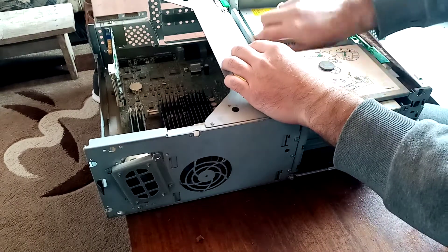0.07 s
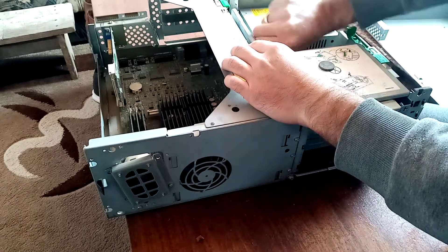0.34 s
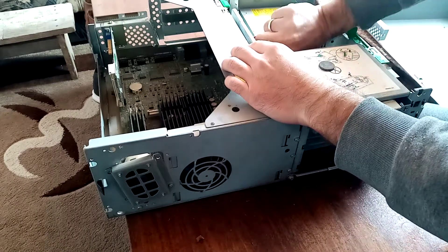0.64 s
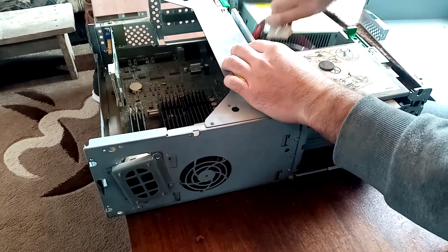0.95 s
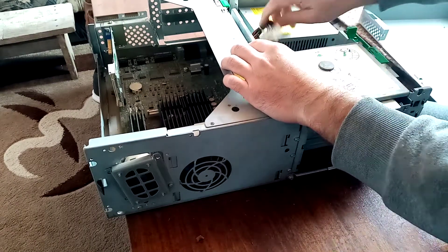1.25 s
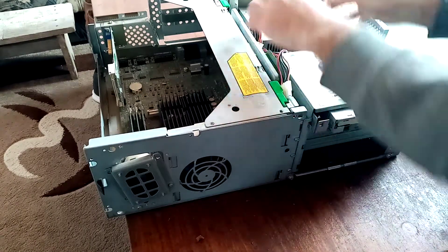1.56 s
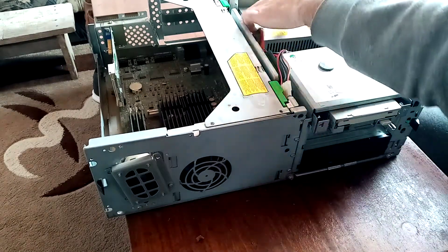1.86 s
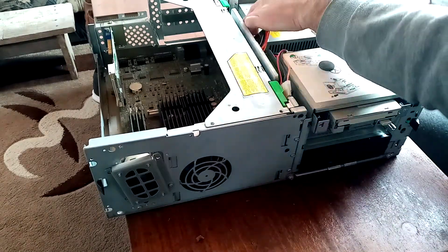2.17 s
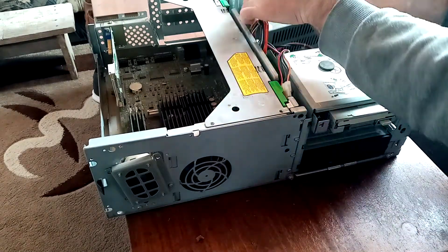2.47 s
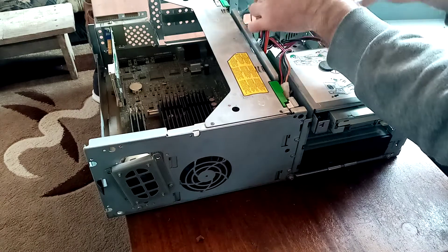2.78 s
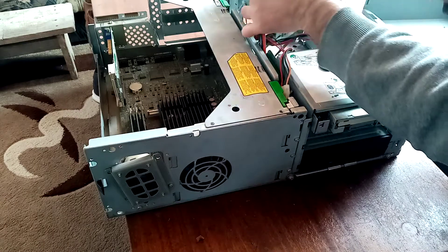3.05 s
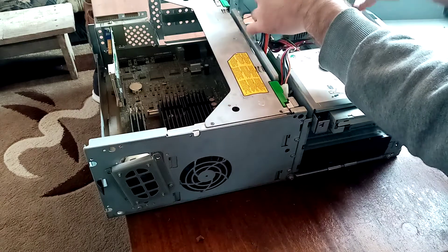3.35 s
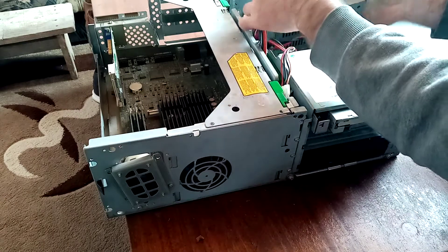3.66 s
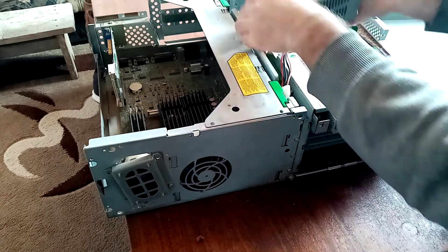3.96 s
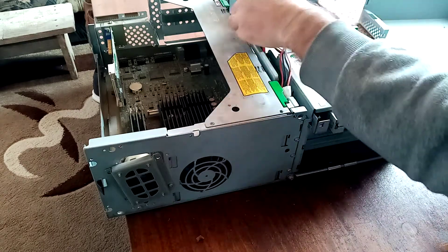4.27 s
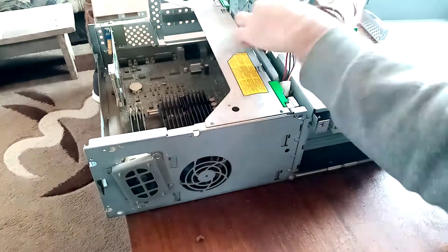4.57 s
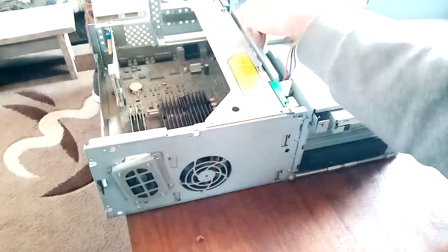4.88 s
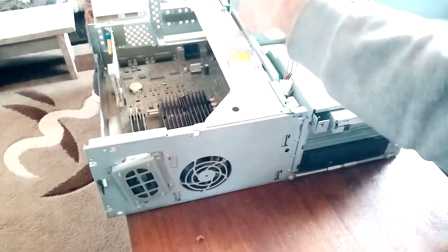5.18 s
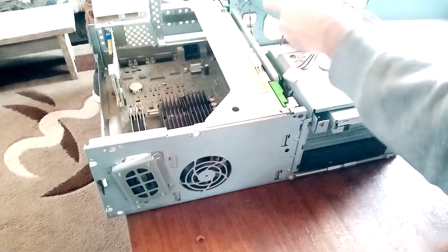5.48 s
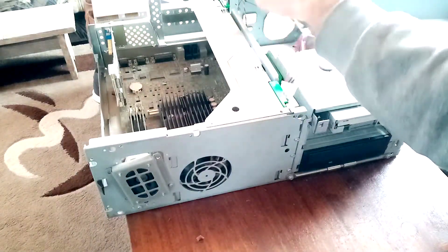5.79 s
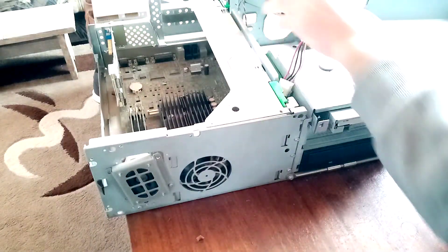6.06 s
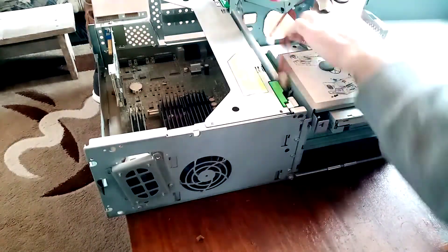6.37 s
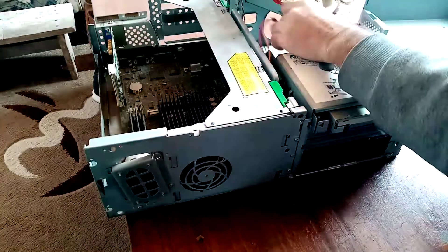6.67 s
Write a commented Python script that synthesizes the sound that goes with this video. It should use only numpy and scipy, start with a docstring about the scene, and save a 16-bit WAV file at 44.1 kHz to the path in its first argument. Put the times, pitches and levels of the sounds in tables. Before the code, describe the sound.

Hands work inside a steel computer case, with irregular knocks, clicks and scrapes of metal and plastic parts.

```python
"""Hands free cables and a drive in an open steel computer case on a table, in a small room.
Light taps lead, just before 1 s, to the loudest knocks: impacts excite the modes of the panels and
the case rocks. From about 2 s a sleeve brushes past and parts scrape by stick-slip friction.
Lighter knocks and rubbing follow; from near 5 s to the end, plugs and steel parts click more sharply.
Throughout, the sound and its reflections reach two unlike microphones over a faint room tone."""
import sys
import numpy as np
from scipy import signal
from scipy.fft import rfft, irfft, next_fast_len
from scipy.io import wavfile

SR = 44100
rng = np.random.default_rng(int(sys.argv[2]) if len(sys.argv) > 2 else 0)


def persist_wave(psi):
    """Save psi, clipped to +-1, as 16-bit WAV."""
    counts = np.round(np.clip(psi, -1, 1) * 32767).astype(np.int16)
    wavfile.write(sys.argv[1], SR, np.atleast_2d(counts).T)


N = 305613
RESPONSE_SAMPLES = 24000
T = np.arange(RESPONSE_SAMPLES) / SR  # time axis of one impulse response [s]
RIGHT_LAG_S = 0.0009  # the case lies nearer the left microphone

# spectrum of the room tone: (frequency [Hz], relative density [dB])
ROOM_TONE_SPECTRUM = [(30, 4), (100, 4.5), (270, 1.5), (500, 11), (1000, -17.5), (3000, -7.5),
                      (8000, -9), (15000, -18.5)]
# reverberation of the room: (frequency [Hz], t60 [s])
ROOM_T60 = [(100, 0.28), (400, 0.29), (1000, 0.25), (3000, 0.26), (7000, 0.21), (15000, 0.18)]
# swings of the sleeve along the case: (middle [s], duration [s], level [dB])
SLEEVE_SWINGS = [(0.3, 0.91, -75.5), (1.22, 0.17, -61.5), (1.7, 0.55, -58), (2.36, 0.79, -54),
                 (3.683, 0.66, -70), (4.4, 1.5, -71.5), (5.5, 0.48, -64), (6.177, 0.13, -75),
                 (6.65, 0.98, -64.5)]
# spectrum of rubbing cloth: (frequency [Hz], relative density [dB])
CLOTH_SPECTRUM = [(200, -7.5), (1000, -16), (3000, -5), (7000, 4), (10000, 2.5), (15000, 5.5)]
# modes of the steel case: (frequency [Hz], relative level [dB], t60 [s])
CASE_MODES = [(125, 0, 0.061), (180, 1, 0.25), (190, -2, 0.072), (283.6, -2, 0.28), (352.2, 4, 0.12),
              (441.7, 1.5, 0.26), (643.6, 2, 0.37), (840, -11, 0.36), (915, -5.5, 0.24), (1095, 2, 0.04),
              (1185, 8, 0.12), (1480, -12.5, .22), (1535, -10, 0.28), (1635, -5, 0.22), (1727, -0.5, 0.5),
              (2823, -8.5, 0.37), (3800, 0, 0.2)]
# a hand pushes or pulls a part: (start [s], duration [s], bump level [dB], scrape level [dB])
HAND_MOVES = [(0.164, 0.083, -68, -68.5), (0.267, 0.15, -66, -66.5), (0.663, 0.04, -59, -57),
              (0.688, 0.29, -44, -42), (1.13, 0.27, -70.5, -78.5), (1.851, 0.11, -55.5, -61),
              (2.085, 0.21, -58.5, -46), (2.385, 0.18, -51, -40.5), (2.588, 0.11, -64.5, -53.5),
              (2.846, 0.29, -81, -67.5), (3.065, 0.11, -61, -58.5), (3.18, 0.22, -64.5, -52),
              (3.556, 0.059, -84, -68.5), (3.892, 0.47, -65.5, -62), (4.076, 0.08, -58, -56.5),
              (4.287, 0.36, -60.5, -65.5), (4.342, 0.033, -68, -49.5), (4.778, 0.085, -60, -58),
              (4.907, 0.15, -59, -59.5), (5.15, 0.15, -73.5, -67.5), (5.231, 0.27, -63, -53),
              (5.578, 0.35, -56, -54), (5.96, 0.057, -66, -78), (6.166, 0.038, -69, -84),
              (6.267, 0.12, -58, -45), (6.503, 0.06, -62.5, -49), (6.631, 0.063, -63, -55),
              (6.787, 0.13, -65, -58)]
# hands resting on the case: (bump level [dB], scrape level [dB])
RESTING_DB = [-78, -80.5]
# spectrum of fingers bumping the chassis: (frequency [Hz], relative gain [dB])
BUMP_SPECTRUM = [(30, -30.5), (70, -20.5), (130, -0.5), (280, 8.5), (400, 7), (600, -17), (1500, -28.5)]
# spectrum of parts scraping on steel: (frequency [Hz], relative gain [dB])
SCRAPE_SPECTRUM = [(200, -31.5), (500, 6.5), (950, 0.5), (1500, 2), (3000, -1.5), (4500, -5), (6200, -3),
                   (9000, -11), (15000, -11)]
# heavy pushes rock the case on the table: (time [s], frequency [Hz], level [dB], t60 [s])
ROCKING_THUMPS = [(.785, 118, -50, 0.31), (.954, 114, -31, 0.074), (.967, 278, -5.5, 0.022),
                  (2.137, 133, -48, 0.13), (3.207, 451, -21.5, 0.031), (3.347, 440, -29, 0.07),
                  (3.366, 334, -46, 0.045), (6.247, 153.5, -46, 0.84)]
# panels, thin edges and clips catch and ring: (time [s], frequency [Hz], level [dB], t60 [s])
PANEL_PINGS = [(.425, 1600, -57, .2), (.695, 1785, -35, .3), (.705, 1641, -38, .3), (.78, 431, -33, .3),
               (1.295, 809, -47, .3), (2.555, 2390, -44, .26), (3.041, 1530, -50, .24),
               (3.568, 6700, -57, .1), (4.556, 4323, -57, .3), (5.345, 800, -53, .3),
               (5.734, 1090, -43, .18)]
# clicks and knocks; weight adds chassis thud, hardness is high for steel and low for a padded knock:
# (time [s], force [dB], weight [dB], hardness [dB])
IMPACTS = [(-0.008, -52, -2.5, 4), (0.153, -69.5, 4, 8), (0.309, -63.5, 2, -1), (0.403, -54, -12, -5.5),
           (0.694, -25, -6.5, -4.5), (0.704, -37, -4, 5.5), (0.775, -27, -2.5, -4), (0.793, -30, 0, -3.5),
           (0.808, -36.5, -9, -1.5), (0.933, -35, 7.5, -16), (0.948, -35.5, -0.5, 1.5),
           (0.962, -31.5, -2.5, -4.5), (1.293, -40.5, -10, -11), (1.412, -54.5, -14, -14.5),
           (1.665, -52, -2, -13.5), (1.82, -52, -8, -8), (1.871, -51, 4, -4.5), (2.049, -56, -5, 3.5),
           (2.111, -39.5, 1, -11.5), (2.137, -38.5, 3.5, -6.5), (2.368, -39, -4, 1), (2.388, -49, 0.5, 4),
           (2.653, -58.5, -12, 13), (2.821, -52, -8.5, -7), (2.853, -60, -3.5, 7.5),
           (2.96, -53.5, -5.5, -13), (3.038, -47, -20, -8), (3.208, -46, 5, -11.5), (3.27, -46.5, 5, -6),
           (3.341, -44, 5, -6), (3.568, -65.5, 7, -19), (4.131, -42, -0.5, -2.5), (4.297, -48.5, -4, -1),
           (4.392, -45, -3, -7), (4.508, -55.5, 4.5, -14), (4.572, -55, 4.5, -6.5),
           (4.744, -73.5, 11.5, -2), (4.799, -48, -9.5, 2), (4.822, -53, 7.5, 2), (4.873, -37, -9, 5.5),
           (4.884, -41, 0.5, 6), (4.972, -51.5, 7.5, -5.5), (5.239, -53, 6.5, 2.5), (5.412, -64, -6, 12),
           (5.458, -47.5, -4, -7), (5.487, -59.5, -17, 17), (5.612, -48.5, 7, -3), (5.732, -33, -17, 1.5),
           (5.804, -45.5, -13, 10.5), (5.809, -38, -12.5, -6), (5.933, -50, -1, 3), (6.241, -40, -3.5, 8),
           (6.251, -31, -0.5, -17.5), (6.333, -42, -9, 5.5), (6.359, -61, -1.5, 14.5),
           (6.5665, -44.5, -6, 8), (6.864, -44.5, -13, 4.5), (6.88, -40.5, -6, 7.5)]
# spectrum of a blow before its registers are balanced: (frequency [Hz], relative gain [dB])
IMPACT_SPECTRUM = [(30, -27), (60, -24.5), (85, -14), (125, -0.5), (190, 2.5), (280, 6.5), (430, 4),
                   (540, -3.5), (700, -2.5), (1100, -11.5), (1800, -9.5), (2600, -9), (3200, -10.5),
                   (4700, -11), (6500, -9.5), (9000, -17), (15000, -18.5)]
# edges of the thud, body, clack and tick registers: (frequency [Hz])
REGISTER_EDGES = [80, 500, 2000, 7000, 16000]
# response of the left microphone: (frequency [Hz], gain [dB])
LEFT_RESPONSE = [(100, -5.5), (1300, -6.5), (4400, -3.5), (8000, -7), (9300, 1), (11000, -34.5),
                 (13500, -23.5), (15300, -29.5)]
# response of the right microphone: (frequency [Hz], gain [dB])
RIGHT_RESPONSE = [(9000, -0.5), (11000, -7.5), (13800, -11.5), (15200, 3)]


def amp(db):
    """Amplitude ratio of a level in decibels."""
    return 10 ** (np.asarray(db) / 20)


def unit_rms(x):
    """Normalisation to a mean power of one."""
    return x / np.sqrt(np.mean(x ** 2) + 1e-20)


def unit_energy(x):
    """Normalisation of each row to an energy of one."""
    return x / (np.linalg.norm(x, axis=-1, keepdims=True) + 1e-20)


def curve(points, hz):
    """Interpolation of (frequency, value) points on a log-frequency axis."""
    point_hz, value = np.transpose(points)
    return np.interp(np.log(hz + 1), np.log(point_hz + 1), value)


def filtered(x, points):
    """Zero-phase filtering by a curve of (frequency [Hz], gain [dB])."""
    size = next_fast_len(x.shape[-1] + 2048)
    gain = amp(curve(points, np.fft.rfftfreq(size, 1 / SR)))
    return irfft(rfft(x, size) * gain, size)[..., :x.shape[-1]]


def minimum_phase(db):
    """Causality: a frequency response with these gains that rings only after the blow."""
    log_gain = np.log(amp(np.r_[db, db[-2:0:-1]]))
    return np.exp(np.conj(signal.hilbert(log_gain)))[:len(db)]


def add(mix, start_s, sound):
    """Superposition of a stereo sound on the mix."""
    start = round(start_s * SR)
    part = mix[:, max(start, 0):start + sound.shape[1]]
    part += sound[:, max(-start, 0):][:, :part.shape[1]]


def room_tone(level_db=-88.5):
    """Stationary noise, uncorrelated between the two microphones."""
    return amp(level_db) * unit_rms(filtered(rng.standard_normal((2, N)), ROOM_TONE_SPECTRUM))


def room_response(tail_db=7.0, early_s=0.0082, build_s=0.003, coherent_hz=600, echoes_per_s=9000):
    """Multipath propagation from one spot: direct sound, case-wall reflections, reverberant tail."""
    shape = (2, RESPONSE_SAMPLES)
    echoes = rng.standard_normal(shape) * (rng.random(shape) < echoes_per_s / SR)
    hz, t, spectra = signal.stft(echoes, SR, nperseg=256)
    coherence = 1 / (1 + (hz[:, None] / coherent_hz) ** 2)  # long waves reach both microphones alike
    spectra[1] = coherence * spectra[0] + np.sqrt(1 - coherence ** 2) * spectra[1]
    decay = amp(-60 * t / curve(ROOM_T60, hz)[:, None])
    tail = signal.istft(spectra * decay, SR, nperseg=256)[1][:, :RESPONSE_SAMPLES]
    early = np.roll(tail, -RESPONSE_SAMPLES // 20, axis=1) * np.exp(-T / early_s)
    response = unit_energy(early) + amp(tail_db) * unit_energy(tail * (1 - np.exp(-T / build_s)))
    response[:, 0] += 1  # direct sound
    response[1] = np.roll(response[1], round(RIGHT_LAG_S * SR))
    return response


def moving_source(x, spots=3, wander_hz=2.5):
    """Reflections depend on position: the wandering hand crossfades between paths at constant power."""
    turns = wander_hz * np.arange(N) / SR + np.arange(spots)[:, None] / spots
    shares = np.cos(np.pi * turns) * np.sqrt(2 / spots)
    return sum(signal.oaconvolve((share * x)[None], unit_energy(room_response()), axes=1)[:, :N]
               for share in shares)


def stick_slip(per_s, spread_db):
    """Stick-slip friction: tiny impulses of unequal size at random moments."""
    sizes = amp(spread_db * np.minimum(rng.exponential(1, N), 4))
    return unit_rms(rng.choice([-1, 1], N) * (rng.random(N) < per_s / SR) * sizes)


def sleeve(rest_db=-77):
    """Friction of cloth fibres: a bright hiss that follows the speed of an arm never quite still."""
    t = np.arange(N) / SR
    speed = sum(amp(db) * np.cos(np.pi * np.clip((t - middle) / length, -.5, .5))
                for middle, length, db in SLEEVE_SWINGS)
    hiss = unit_rms(filtered(stick_slip(per_s=7000, spread_db=3.5), CLOTH_SPECTRUM))
    return moving_source((amp(rest_db) + speed) * hiss)


def case_modes():
    """Normal modes of the steel case: one damped sinusoid a row."""
    hz, db, t60 = np.transpose(CASE_MODES)[:, :, None]
    return amp(db) * unit_energy(np.sin(2 * np.pi * hz * T) * amp(-60 * T / t60))


def effort(start, length, grip_s=0.022, ease_db_per_s=13.5, release_db_per_s=225.5):
    """Driving force of a hand: a linear rise, exponential decay as the part gives, then release."""
    age = np.maximum(np.arange(N) / SR - start, 0)
    fall_db = ease_db_per_s * age + release_db_per_s * np.maximum(age - length, 0)
    return np.minimum(age / grip_s, 1) * amp(-fall_db)


def handling(case_db=-29):
    """Forced vibration of the chassis: fingers bump it, cables and the drive scrape over its steel."""
    efforts = np.array([effort(start, length) for start, length, _, _ in HAND_MOVES])
    move_gains = amp(np.array(HAND_MOVES)[:, 2:]).T
    bump_envelope, scrape_envelope = amp(RESTING_DB)[:, None] + move_gains @ efforts
    body = amp(case_db) * case_modes().sum(0)
    body[0] += 1  # the impulse itself, ahead of the ringing
    bumps = signal.oaconvolve(stick_slip(per_s=65, spread_db=-2.5), body)[:N]
    scrapes = signal.oaconvolve(stick_slip(per_s=650, spread_db=4.0), body)[:N]
    return moving_source(bump_envelope * unit_rms(filtered(bumps, BUMP_SPECTRUM))
                         + scrape_envelope * unit_rms(filtered(scrapes, SCRAPE_SPECTRUM)))


def free_vibrations(events, rise_s):
    """Damped oscillation: each event excites one mode, which reaches the left microphone first."""
    out = np.zeros((2, N))
    age = np.maximum(T - np.array([[0], [RIGHT_LAG_S]]), 0)
    for start, hz, db, t60 in events:
        envelope = amp(db - 60 * age / t60) * (1 - np.exp(-age / rise_s))
        add(out, start, np.sin(2 * np.pi * hz * age) * envelope)
    return out


def small_part_modes(count=120, t60=0.012):
    """Small bodies resonate high: plugs, brackets and clips give a crowd of quickly damped modes."""
    hz = rng.uniform(1550, 11000, (count, 1))
    return unit_energy(np.sin(2 * np.pi * hz * T) * amp(-60 * T / t60))


def register_levels(force_db, weight_db, hardness_db, tick_db=-3.5, tick_growth=1.3):
    """Energy of an impact by register: weight feeds the thud, hardness the clack and tick."""
    return force_db + np.array([weight_db, 0, hardness_db, tick_db + tick_growth * hardness_db])


def contact_time(levels_db, force_db, base_s=0.0015, firm_db=-45):
    """Contact stiffness: bright steel-on-steel blows end at once, dull or light ones press in slowly."""
    brightness_db = np.clip(levels_db[-1] - force_db, -10, 20)
    lightness_db = np.clip(firm_db - levels_db.max(), 0, 10)
    return base_s * amp(0.22 * lightness_db - 0.21 * brightness_db)


def register_filter(spectrum, hz, levels_db, span_s=0.03):
    """Equalisation: brings each register's energy, averaged over span_s, towards its level."""
    edges = np.array(REGISTER_EDGES)
    centres = np.sqrt(edges[1:] * edges[:-1])
    bands = (hz >= edges[:-1, None]) & (hz < edges[1:, None])
    power = (abs(spectrum) ** 2).mean(0) / (len(hz) - 1) / (span_s * SR)
    gain_db = np.zeros(len(centres))
    for _ in range(3):  # neighbouring registers overlap, so their gains settle together
        gain = amp(curve(np.c_[centres, gain_db], hz))
        gain_db += levels_db - 10 * np.log10(bands @ (power * gain ** 2))
    return minimum_phase(curve(np.c_[centres, gain_db], hz))


def impacts(case_db=-29, parts_db=-28, spots=7, fft_size=2 ** 15):
    """Impact excitation: a brief chattering force rings the modes of the case and its small parts."""
    out = np.zeros((2, N))
    case, parts = case_modes(), small_part_modes()
    hz = np.fft.rfftfreq(fft_size, 1 / SR)
    paths = [rfft(room_response(), fft_size) for _ in range(spots)]
    colour = minimum_phase(curve(IMPACT_SPECTRUM, hz))
    for k, (start, force_db, weight_db, hardness_db) in enumerate(IMPACTS):
        levels_db = register_levels(force_db, weight_db, hardness_db)
        contact_decay = np.exp(-T / contact_time(levels_db, force_db))
        chatter = unit_energy(rng.standard_normal(RESPONSE_SAMPLES) ** 3 * T * contact_decay)
        # the place of the blow decides how strongly each mode answers
        ring = amp(case_db) * rng.standard_normal(len(case)) @ case
        ring += amp(parts_db) * rng.standard_normal(len(parts)) @ parts
        blow = rfft(chatter + ring * (1 - contact_decay), fft_size) * colour * paths[k % spots]
        add(out, start, irfft(blow * register_filter(blow, hz, levels_db)))
    return out


def scene():
    """Linear superposition of room tone, impacts, friction and free vibrations."""
    thumps = free_vibrations(ROCKING_THUMPS, rise_s=0.0056)
    pings = free_vibrations(PANEL_PINGS, rise_s=0.0055)
    return room_tone() + impacts() + handling() + sleeve() + thumps + pings


def record(dry, cutoff_hz=15750):
    """Band-limited transduction: the left side is weaker and duller, the right has a port resonance."""
    heard = np.array([filtered(dry[0], LEFT_RESPONSE), filtered(dry[1], RIGHT_RESPONSE)])
    lowpass = signal.firwin(511, cutoff_hz, window=("kaiser", 9), fs=SR)
    return signal.oaconvolve(heard, lowpass[None], "same")


dry = scene()
out = record(dry)
persist_wave(out)
```